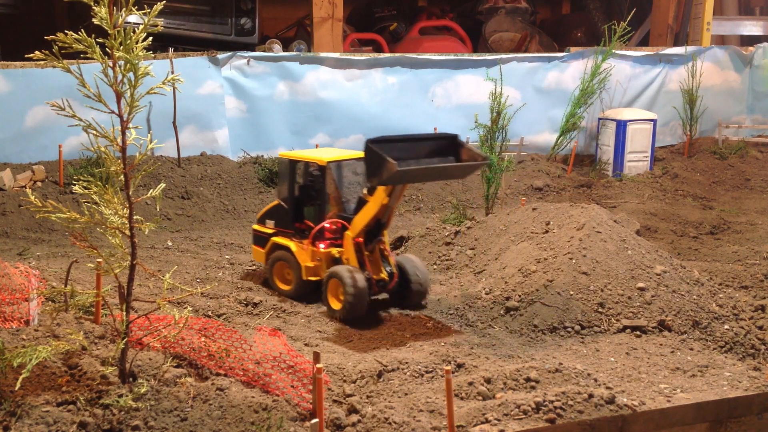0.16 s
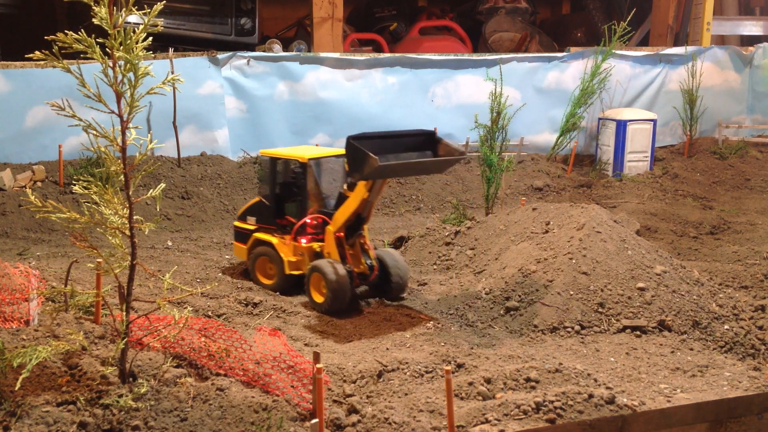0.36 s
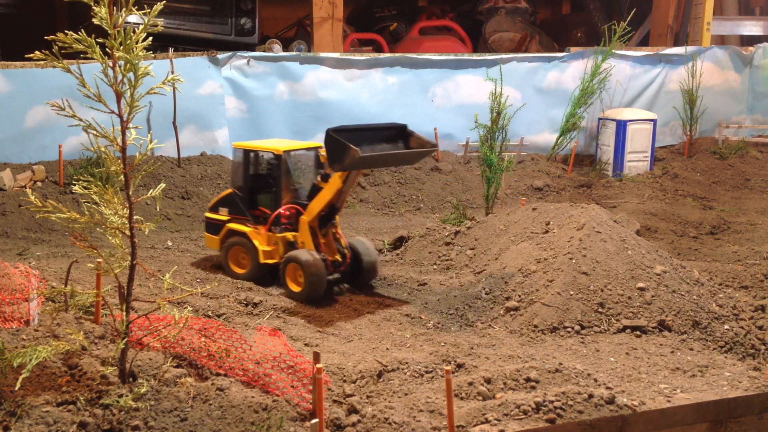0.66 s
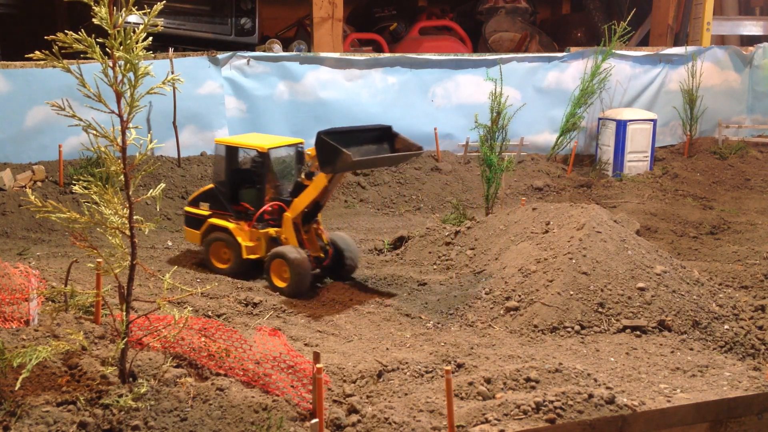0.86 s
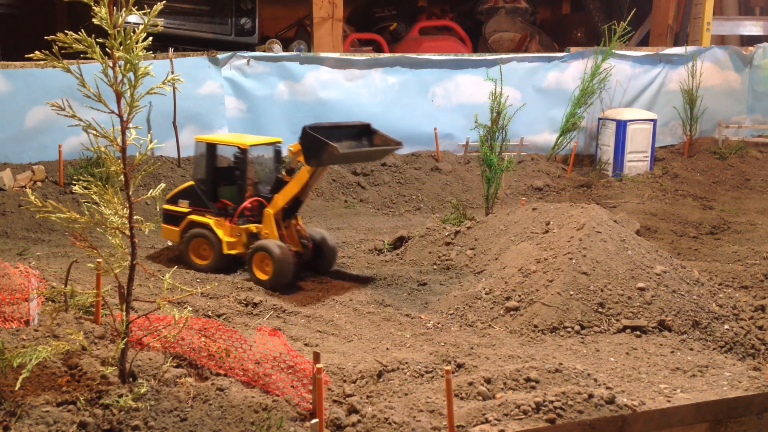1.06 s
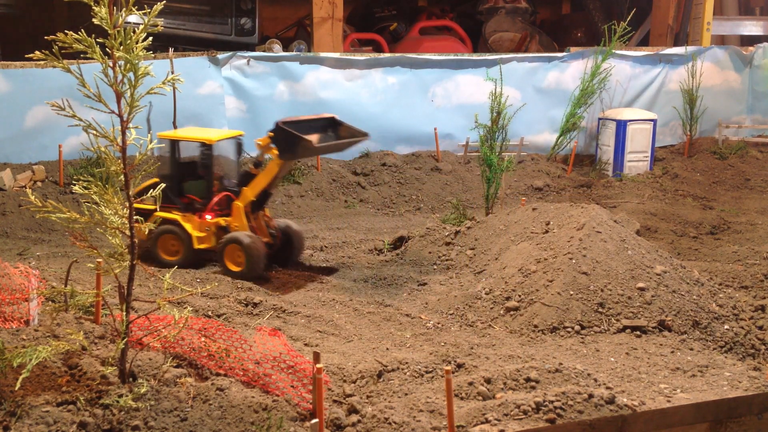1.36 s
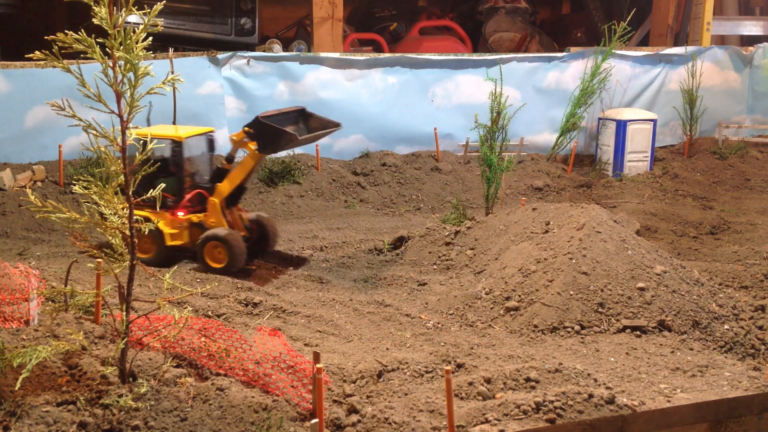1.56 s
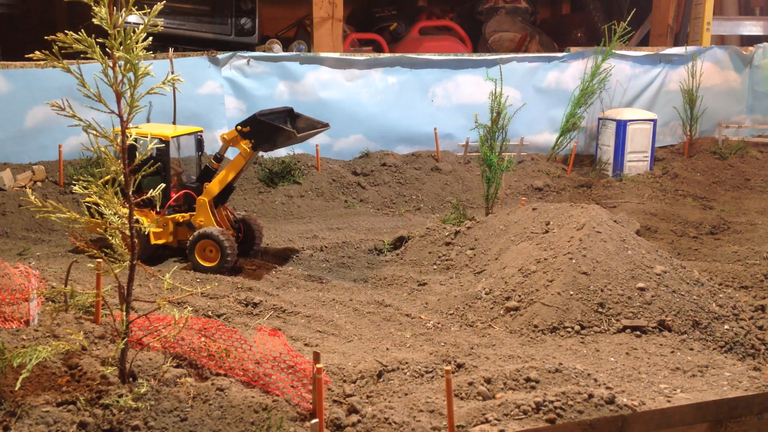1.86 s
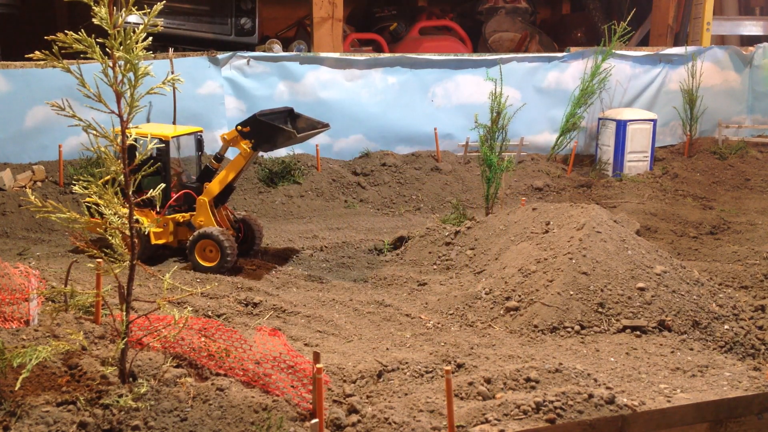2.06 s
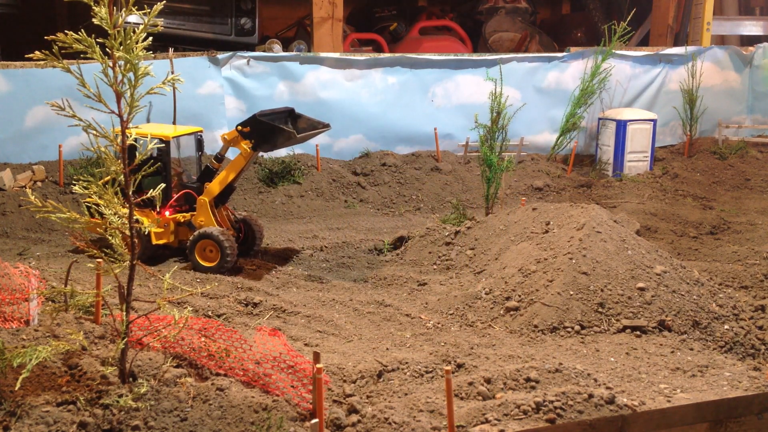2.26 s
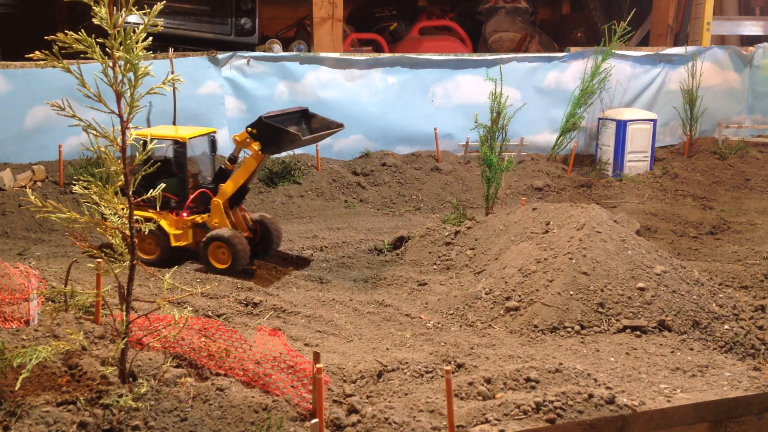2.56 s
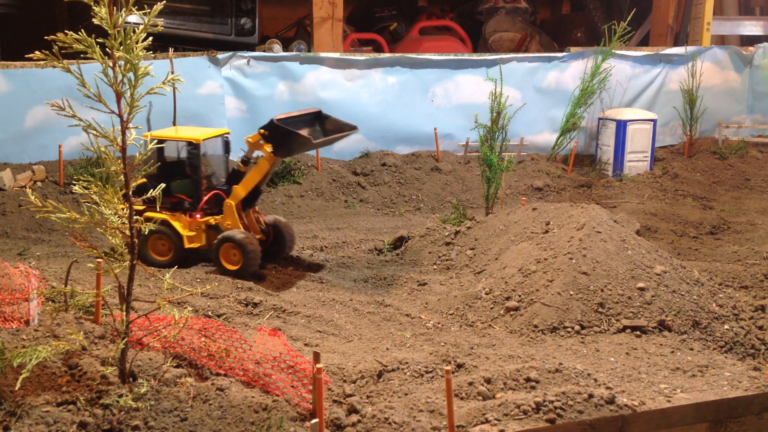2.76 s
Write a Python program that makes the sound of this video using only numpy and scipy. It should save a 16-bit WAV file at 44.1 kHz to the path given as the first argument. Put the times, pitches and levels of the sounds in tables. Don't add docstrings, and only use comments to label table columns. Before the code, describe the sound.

A toy loader's small electric motors whine and hiss, stop briefly, then whirr again, rougher.

```python
import sys
import numpy as np
from scipy import signal
from scipy.fft import rfft, irfft, next_fast_len
from scipy.io import wavfile
from scipy.ndimage import uniform_filter1d

SR = 44100
rng = np.random.default_rng(int(sys.argv[2]) if len(sys.argv) > 2 else 0)


def unload_wav(signal):
    wavfile.write(
        sys.argv[1],
        SR,
        np.round(np.clip(np.atleast_2d(signal).T, -1, 1) * 32767).astype(np.int16),
    )


def convert_level_to_amplitude(level_db):
    exponent = np.asarray(level_db, float) / 20
    return 10 ** exponent


N = 127890
T = np.arange(N) / SR

# centre_hz, width_hz
CAB_PANELS = [(1740, 250), (3400, 500), (5150, 600), (7000, 500), (8350, 450), (11700, 500), (14300, 500)]


def rms_one(x):
    return x / np.sqrt(np.mean(x ** 2) + 1e-20)


def in_time(rows):
    s, *columns = np.transpose(rows)
    return [np.interp(T, s, c) for c in columns]


def gate(start_s, end_s):
    edge_s = .02
    return np.clip(np.minimum(T - start_s, end_s - T) / edge_s + .5, 0, 1)


def drift(rate_hz):
    r = np.exp(-80 * np.pi * rate_hz / SR)
    slow = signal.lfilter([1], [1, -2 * r, r * r], rng.standard_normal(N // 40 + 2002))[2000:]
    return np.interp(np.arange(N) / 40, np.arange(len(slow)), rms_one(slow))


def tone(hz, fade_db, rate_hz):
    phase = 2 * np.pi * (np.cumsum(hz) / SR + rng.random())
    return np.sqrt(2) * np.sin(phase) * convert_level_to_amplitude(fade_db * drift(rate_hz))


def peak(x, hz, width_hz):
    r = np.exp(-np.pi * width_hz / SR)
    poles = [1, -2 * r * np.cos(2 * np.pi * hz / SR), r * r]
    return signal.lfilter(np.array([1, 0, -1]) * (1 - r * r) / 2, poles, x)


def above(hz):
    high_pass = signal.butter(3, hz, "high", fs=SR, output="sos")
    return rms_one(signal.sosfilt(high_pass, rng.standard_normal(N)))


def banded(spectrum, shared_db, own_db):
    out = 0
    together = drift(6) + drift(60)
    edges_hz = 20 * 2 ** np.arange(0, 9.8, 1 / 3)
    white = rng.standard_normal((2, N))
    hz, db = np.transpose(spectrum)
    for k, (low, high) in enumerate(zip(edges_hz, edges_hz[1:])):
        if high < hz[0]:
            continue
        band = signal.sosfilt(signal.butter(2, [low, high], "band", fs=SR, output="sos"), white[k % 2])
        level_db = np.interp(np.log(low * high) / 2, np.log(hz), db, left=-80)
        out = out + band * convert_level_to_amplitude(level_db + shared_db * together + own_db * drift(15.0))
    return rms_one(out)


def mesh(hz, db, tilt_db, orders):
    teeth, wobble, fade_db = 28.5, .004, 2.8
    runout, runout_twice = .4, .25
    hz = hz * (1 + wobble * drift(30))
    out = 0
    for k, order_db in orders:
        lines = tone(k * hz, fade_db, 43)
        lines = lines + runout * tone((k + 1 / teeth) * hz, fade_db, 16)
        lines = lines + runout_twice * tone((k + 2 / teeth) * hz, fade_db, 22)
        out = out + lines * convert_level_to_amplitude(db + order_db + tilt_db * (k > 1))
    return out, 2 * np.pi * np.cumsum(hz) / SR / teeth


def reverse_gears():
    # start_s, tooth_hz, level_db, overtone_tilt_db
    main_motor = [(0, 3125, -41, -8), (.06, 3095, -42.5, -6), (.14, 3155, -45, -4), (.23, 3180, -48, -2),
                  (.28, 3105, -49, -4), (.46, 3120, -47, -6), (.55, 3170, -44, -8), (.63, 3110, -51, -4),
                  (.675, 3003, -64, 17), (.79, 3000, -61, 13), (.9, 3092, -46, -10), (.98, 3205, -45, -8),
                  (1.08, 3140, -44, -8), (1.2, 3100, -52, -3), (1.29, 3035, -47, -3), (1.34, 3120, -49, -3),
                  (1.56, 3225, -54, 0), (1.665, 2915, -64, 3)]
    # start_s, tooth_hz, level_db
    other_motor = [(0, 3298, -49), (.12, 3260, -72), (.22, 3298, -49), (.4, 3160, -53), (.56, 3192, -53.5),
                   (.72, 3217, -48.5), (.82, 3164, -50.5), (1.1, 3290, -67), (1.24, 3237, -56),
                   (1.33, 3113, -60), (1.5, 3234, -55), (1.62, 3096, -54)]
    # multiple, level_db
    orders = [(1, 0.1), (2, -1.5), (3, -7), (4, -19)]
    coast_hz_per_s, coast_db_per_s, lowest_hz = 11000, 120, 300
    coast_s = np.maximum(T - main_motor[-1][0], 0)
    fall_hz, fall_db = coast_hz_per_s * coast_s, coast_db_per_s * coast_s
    hz, db, tilt_db = in_time(main_motor)
    back, turn = mesh(np.maximum(hz - fall_hz, lowest_hz), db - fall_db, tilt_db, orders)
    hz, db = in_time(other_motor)
    twin, _ = mesh(np.maximum(hz - fall_hz, lowest_hz), db - 3 * fall_db, -7.0, orders)
    return back + twin, turn


def forward_gears():
    # start_s, tooth_hz, level_db, overtone_tilt_db
    pull = [
        (2.48, 1562, -85, -2),
        (2.515, 1619, -63, 14),
        (2.565, 1675, -56.5, 7),
        (2.6, 1720, -64, -1),
        (2.67, 1813, -55.5, 9),
        (2.72, 1754, -59.5, 8),
        (2.77, 1665, -57, 5.5),
        (2.81, 1581, -58.5, 4),
        (2.86, 1442, -68.5, 5.5),
    ]
    # multiple, level_db
    orders = [(1, -3), (2, 1), (3, 0), (4, -3), (5, -2), (7, -20), (8, -16)]
    hz, db, tilt_db = in_time(pull)
    rough_hz = hz * (1 + .008 * drift(60))
    ahead = mesh(rough_hz, db - 2.5 + 3 * drift(22), tilt_db, orders)[0] * (T > pull[0][0])
    return sum(peak(peak(ahead, f, w), f, w) for f, w in CAB_PANELS)


def hiss(turn):
    # start_s, level_db
    drive = [(0.0, -44.5), (0.02, -46), (1.37, -47), (1.58, -46), (1.81, -54.5), (1.85, -84), (1.94, -77),
             (2.29, -71), (2.33, -67), (2.36, -58.5), (2.41, -53.5), (2.51, -54), (2.55, -54.5),
             (2.61, -52), (2.74, -53), (2.79, -53), (2.87, -52), (2.9, -55)]
    # pitch_hz, density_db
    back_spectrum = [(290, -77), (500, -23), (1050, -14.5), (1850, -7.5), (2720, -13.5), (3180, -2),
                     (3770, -8), (9380, -6.5), (15000, -25.5)]
    # pitch_hz, density_db
    ahead_spectrum = [(290, -68), (500, -13.5), (1330, -4.5), (1770, -1), (2680, -1.5), (4870, -3.5),
                      (6120, -10.5), (8250, -0.5), (15000, -37)]
    # centre_hz, width_hz, gain_db
    shell_modes = [(1060, 130, 5), (2000, 540, 3), (3050, 510, 3.5), (6320, 290, -5), (9730, 1320, -3)]
    notch_hz, notch_width_hz, notch_depth = 2717, 477, 0.59
    dull_hz, dull_per_db = 8080, 0.6
    throb, level_db, cab_share = 0.082, 4, 0.43
    backing = T < 1.9
    effort_db, = in_time(drive)

    raw = np.where(backing, banded(back_spectrum, 0.64, 0.7), banded(ahead_spectrum, 0.83, 0.52))
    raw = raw - notch_depth * peak(raw, notch_hz, notch_width_hz)
    shell = raw + sum((convert_level_to_amplitude(db) - 1) * peak(raw, hz, w) * backing for hz, w, db in shell_modes)
    shell = shell + cab_share * (T > 1.9) * sum(peak(raw, f, w) for f, w in CAB_PANELS)
    shell = shell + above(12880) * convert_level_to_amplitude(np.where(backing, -8, -8.5))

    slack_db = np.minimum(effort_db - np.where(backing, -47, -52), 0)
    treble = shell - signal.sosfiltfilt(signal.butter(2, dull_hz, fs=SR, output="sos"), shell)
    shell = shell + (convert_level_to_amplitude(dull_per_db * slack_db) - 1) * treble
    return shell * (1 + throb * np.cos(turn)) * convert_level_to_amplitude(effort_db + level_db)


def axle():
    # start_s, pitch_hz, level_db, sideband_lift_db
    pair = [(0, 1055, -68, 0), (.36, 1060, -63, 0), (.43, 1060, -56, -2), (.66, 1057, -56, -2),
            (.74, 1050, -65, 0), (.87, 1035, -66, 3), (.93, 1062, -60, 2), (1.03, 1086, -59, 1),
            (1.15, 1096, -58.5, 0), (1.25, 1076, -60, 0), (1.35, 1056, -55.5, -6), (1.5, 1065, -54, -10),
            (1.6, 1072, -54, -10), (1.645, 1030, -55, -8), (1.69, 1062, -58, -6), (1.76, 1000, -75, 0)]
    # shaft_steps, level_db
    sides = [(-1, -12), (1, -4), (2, -6)]
    side_hz = 115.1
    hz, db, lift_db = in_time(pair)
    step_hz = side_hz * hz / hz.mean()
    lines = tone(hz, 1., 8)
    lines = lines + sum(convert_level_to_amplitude(d + lift_db) * tone(hz + k * step_hz, 2.5, 5) for k, d in sides)
    return lines * convert_level_to_amplitude(db - 3) * (T < pair[-1][0])


def wind_up():
    # start_s, pitch_hz, level_db
    climb = [
        (2.32, 1950, -75),
        (2.36, 2062, -62),
        (2.42, 2230, -59),
        (2.5, 2340, -61),
        (2.66, 2335, -61),
        (2.8, 2340, -68),
        (2.9, 2385, -58),
    ]
    hz, db = in_time(climb)
    return tone(hz * (1 + .014 * drift(50)), 5, 40) * convert_level_to_amplitude(db) * (T > climb[0][0])


def slides():
    # start_s, end_s, start_hz, end_hz, level_db
    glides = [(1.615, 1.67, 9400, 8750, -53), (1.68, 1.73, 8350, 6800, -58), (1.53, 1.585, 6480, 6720, -54),
              (1.585, 1.645, 6720, 6100, -55), (1.645, 1.685, 6100, 6230, -58),
              (1.655, 1.69, 960, 940, -61), (1.03, 1.12, 7950, 8350, -59), (1.2, 1.35, 8300, 8550, -62),
              (.69, .74, 7950, 8020, -57), (.76, .92, 8300, 8250, -60), (.83, .9, 7800, 7950, -61),
              (.85, 1.03, 9500, 9800, -58), (1.05, 1.2, 9750, 9850, -60), (2.36, 2.42, 3050, 3250, -63),
              (2.4, 2.5, 4250, 4650, -64), (2.42, 2.52, 7500, 7450, -65)]
    out = 0
    for a, b, from_hz, to_hz, db in glides:
        hz = np.interp(T, [a, b], [from_hz, to_hz]) * (1 + .006 * drift(70))
        out = out + convert_level_to_amplitude(db) * gate(a, b) * tone(hz, 3.5, 50)
    return out


def buzz():
    # pitch_hz, start_s, end_s, level_db
    lines = [(861, .8, 1.65, -70), (1700, .3, 1.6, -63), (1920, .35, 1.65, -65), (3890, 1.2, 1.7, -64),
             (3520, .1, 1.65, -65), (5450, 0, .45, -61), (355, 0, 1.6, -76), (8330, 1.12, 1.2, -60),
             (4475, .1, .4, -60), (9500, 0, .85, -55), (12500, 0, .5, -62), (3710, 1.79, 1.83, -63),
             (1900, 2.32, 2.35, -55), (2816, 2.3, 2.34, -67), (945, 2.5, 2.9, -67), (1900, 2.38, 2.62, -64),
             (1045, 2.395, 2.44, -62), (3510, 2.63, 2.75, -57), (1720, 2.58, 2.8, -60),
             (4080, 2.85, 2.9, -59), (1480, 2.84, 2.9, -60), (4400, 2.81, 2.9, -60),
             (2070, 2.78, 2.85, -59)]
    out = 0
    for hz, a, b, db in lines:
        out = out + convert_level_to_amplitude(db) * gate(a, b) * tone(hz * (1 + .004 * drift(25)), 4, 30)
    return out


def room(x):
    size = next_fast_len(N + SR)
    f = np.arange(size // 2 + 1) * SR / size
    t60_s = 0.32 / (1 + f / 8000)
    delays_s = rng.uniform(.015, .045, 10)
    loops = [convert_level_to_amplitude(-60 * d / t60_s) * np.exp(-2j * np.pi * f * d) for d in delays_s]
    return irfft(rfft(x, size) * sum(g / (1 - g) for g in loops), size)[:N]


def shed():
    # pitch_hz, density_db
    air = [(26, -4), (45, -5.5), (189, -5.5), (300, -10), (668, -12), (1060, -4.5), (1390, -11.5),
           (1900, -12), (15000, -35.5)]
    # pitch_hz, level_db
    machines = [(52, -75), (120, -77)]
    air_db = -59
    return convert_level_to_amplitude(air_db) * banded(air, .5, 1.5) + sum(convert_level_to_amplitude(db) * tone(hz + 5 * drift(8), 5, 8) for hz, db in machines)


def scene():
    whine, turn = reverse_gears()
    loader = whine + forward_gears() + axle() + wind_up() + buzz() + slides() + hiss(turn)
    room_db = -13.5
    return (loader + convert_level_to_amplitude(room_db) * room(loader) + shed())[None]


def bridge(x, count=7):
    centres_s = [0.1167, 0.158, 0.264, 0.3475, 0.709, .776, 1.6718, 2.568, 2.762, 2.8034, 2.8694]
    left, kept_db, treble_left, treble_hz = .07, 4, .22, 9000
    x, gap = x.copy(), int(.022 * SR)
    keep = left + (1 - left) * np.abs(np.linspace(-1, 1, gap)) ** 1.5
    window = np.hanning(2 * gap)
    for s in centres_s:
        i = int(s * SR) - gap // 2
        bins = rfft(x[i - gap // 2:][:2 * gap] * window)
        bin_no = np.arange(len(bins))
        level = np.log(np.abs(bins) + 1e-12)
        score = level - .6 * uniform_filter1d(level, size=41)
        tops = signal.find_peaks(score, distance=12)[0]
        tops = tops[np.argsort(score[tops])[-count:]]
        near = np.abs(bin_no[:, None] - tops).min(axis=1) <= 2
        gain = np.maximum(near, treble_left * (bin_no * SR / 2 / gap > treble_hz))
        lines = (irfft(bins * gain) / (window + 1e-9))[gap // 2:][:gap]
        x[i:i + gap] = keep * x[i:i + gap] + (1 - keep) * convert_level_to_amplitude(kept_db) * lines
    return x


def starved(x):
    from_hz, share_percent, hole_db = 8700, 10, -30
    f, _, cells = signal.stft(x, SR, nperseg=768)
    chance = rng.standard_normal(cells.shape)
    for size, axis in ((3, 0), (2, 0), (7, 1), (4, 1)):
        chance = uniform_filter1d(chance, size=size, axis=axis)
    hole = (chance < np.percentile(chance, share_percent)) & (f[:, None] > from_hz)
    return signal.istft(cells * np.where(hole, convert_level_to_amplitude(hole_db), 1), SR, nperseg=768)[1][:N]


def low_pass(x):
    return signal.sosfilt(signal.butter(12, 16090, fs=SR, output="sos"), x)


def record(dry):
    self_noise_hz, self_noise_db = 7200, -67.5
    heard = dry[0] + convert_level_to_amplitude(self_noise_db) * above(self_noise_hz)
    cut = signal.sosfilt(signal.cheby2(20, 60, 15500, fs=SR, output="sos"), heard)
    cut = signal.sosfilt(signal.butter(3, 42, "high", fs=SR, output="sos"), cut)
    mix = starved(bridge(cut))[None]
    return low_pass(mix)


dry = scene()
out = record(dry)
unload_wav(out)
```